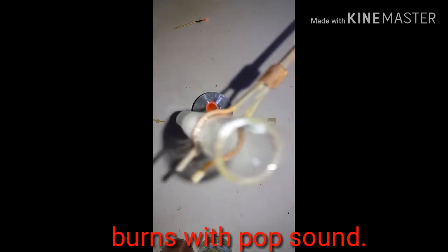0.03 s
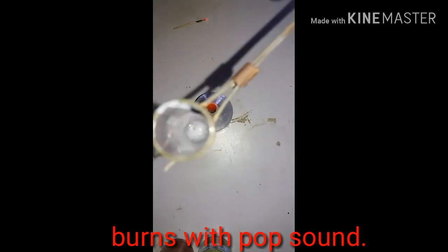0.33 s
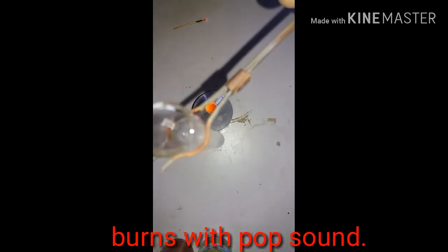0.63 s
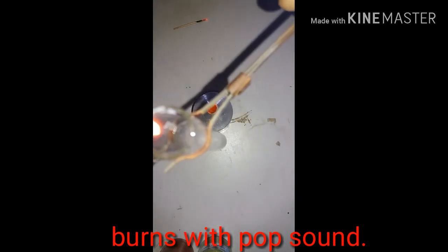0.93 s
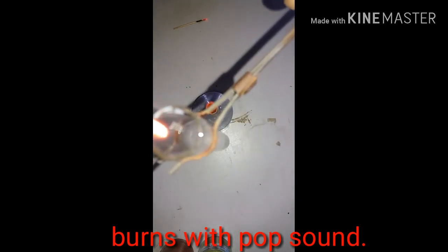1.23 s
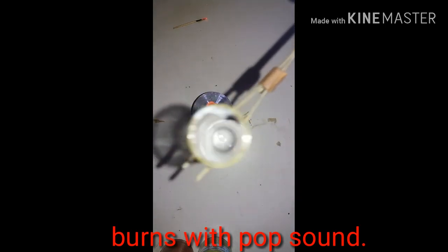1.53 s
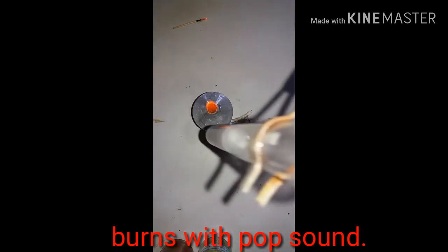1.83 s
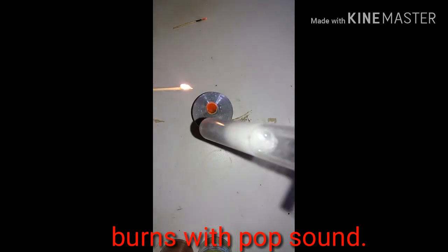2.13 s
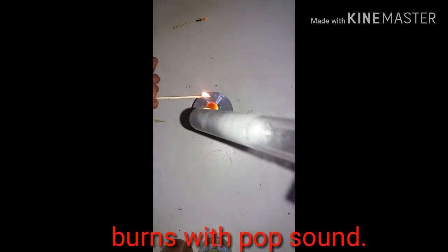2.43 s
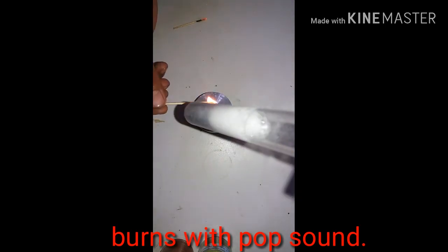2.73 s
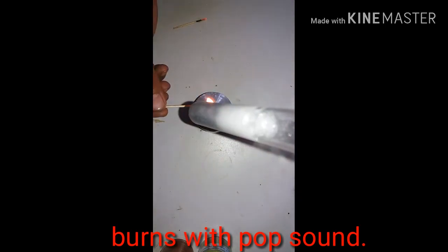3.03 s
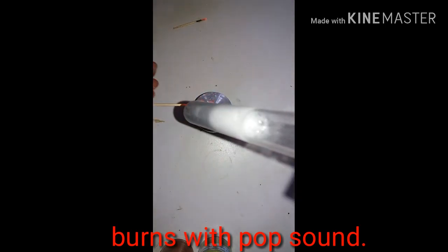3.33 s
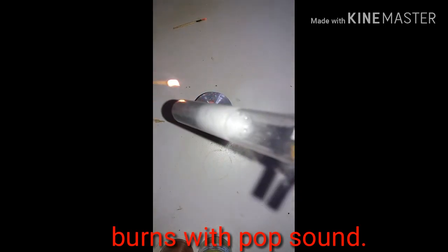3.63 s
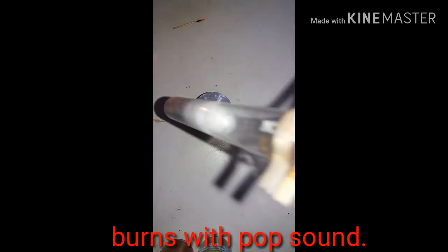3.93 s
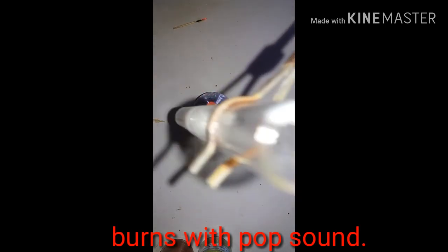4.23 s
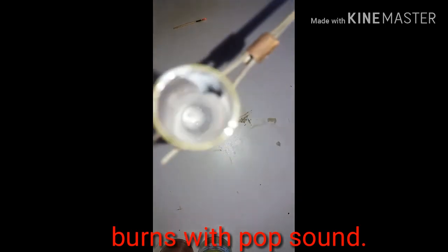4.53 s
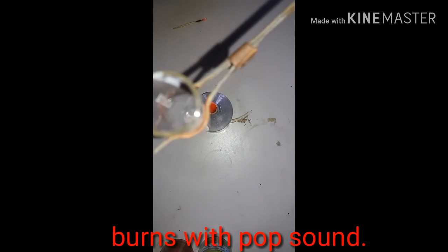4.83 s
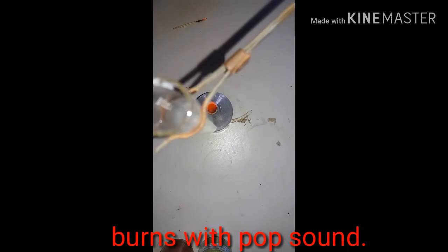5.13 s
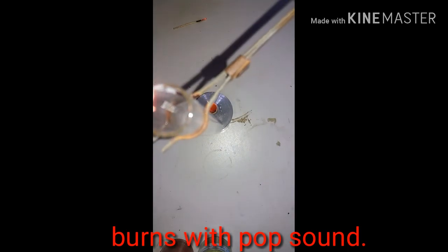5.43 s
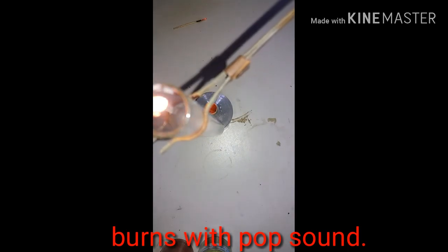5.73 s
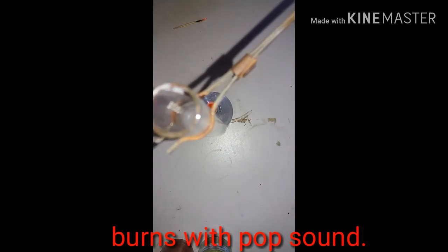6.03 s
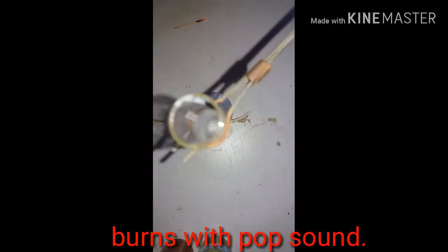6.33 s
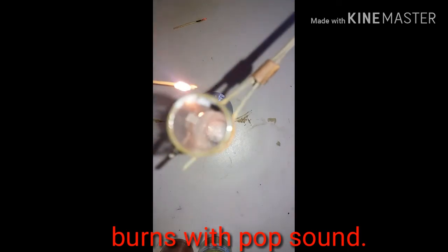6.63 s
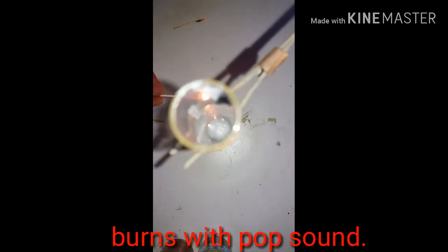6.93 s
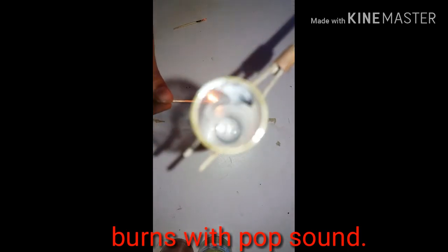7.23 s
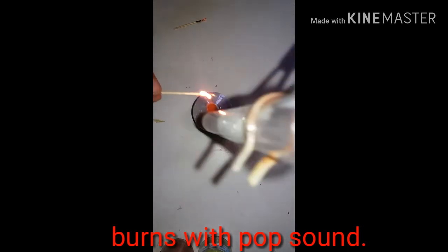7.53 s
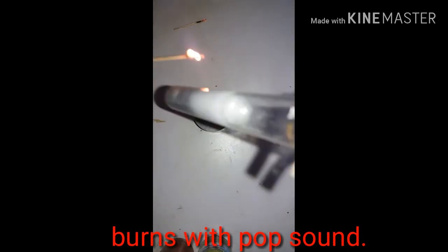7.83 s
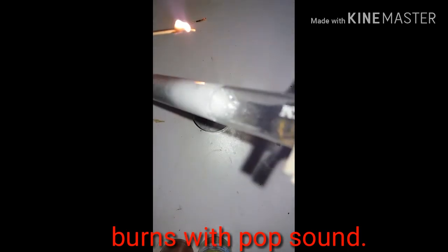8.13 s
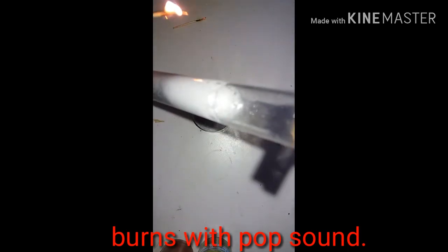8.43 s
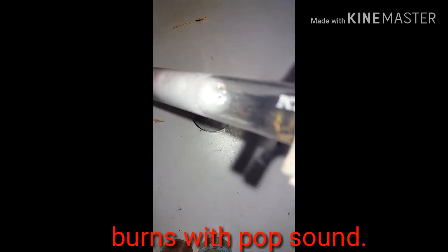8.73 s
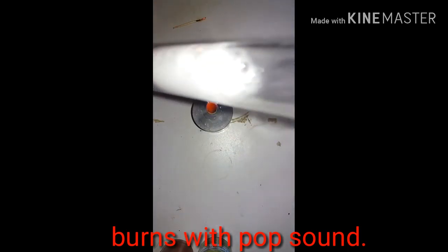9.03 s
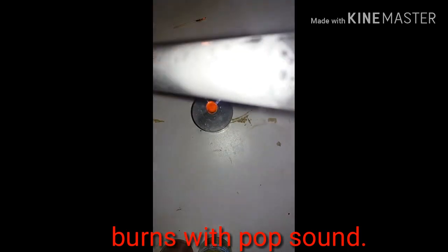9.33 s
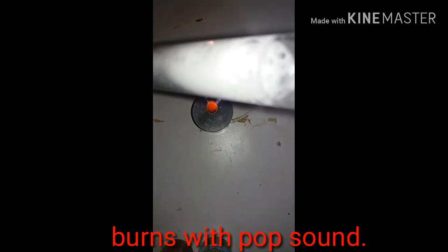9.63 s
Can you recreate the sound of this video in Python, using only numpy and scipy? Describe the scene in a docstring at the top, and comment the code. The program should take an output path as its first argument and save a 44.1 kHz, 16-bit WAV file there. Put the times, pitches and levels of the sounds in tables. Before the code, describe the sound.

A bare, echoing lab is heard through one microphone near a glass test tube, with quiet, hollow room noise and a faint high hiss throughout. At about 1.2 seconds gas ignites in the tube with a sharp pop: a low thump, a very brief whistle and a puff of flame all at once, ringing in the room for a second or so. Around 2.5 seconds a muffled vehicle passes outside, its engine droning softly. At 5.8 seconds comes a second, duller pop, about as loud, with a similar echo. More faint traffic follows around 6.5 seconds, and the background noise steps up slightly at 6.9 seconds. Another soft rumble passes near 8 seconds. From about 9 seconds the distant engine pulls again and a faint hollow tone swells. The two pops stand far above everything else.

```python
"""A bare, echoing lab, one microphone near a glass test tube; still air, faint hiss, traffic outside.
At 1.2 s hydrogen is lit at the tube's mouth: the flame runs down it, sets its air column singing for
a few milliseconds and leaves a ring in the room. A vehicle passes beyond the walls, its engine droning.
At 5.8 s comes a second, duller pop. More muffled traffic follows, the background noise steps up
slightly at 6.9 s, and a hollow tone swells near 9.3 s as the engine pulls again."""
import sys
import numpy as np
from scipy import signal
from scipy.fft import rfft, irfft, next_fast_len
from scipy.io import wavfile

SR = 44100
rng = np.random.default_rng(int(sys.argv[2]) if len(sys.argv) > 2 else 0)


def put_to_file(sound):
    """Save the sound as 16-bit audio at rate SR, in the file named by the first command-line argument."""
    columns = np.atleast_2d(sound).T  # one column per channel
    safe = np.clip(columns, -1, 1)
    whole_steps = np.round(safe * 32767)
    wavfile.write(sys.argv[1], SR, whole_steps.astype(np.int16))


N = 435266
TIME = np.arange(N) / SR

# ignitions: at_s, level_db, flame_db, brightness_db, thump_lag_s, tube_tuning_ratio, room_db
IGNITIONS = [(1.1538, 2, -26, 5, 0.00021, .995, -6.5), (5.8060, 2.5, -23.5, -6, 0.0043, 1.003, -8.5)]
# low thump of the expanding gas: untuned_pitch_hz, first_pop_db, second_pop_db, swell_s, fade_s
THUMP_MODES = [(62, -32, -51, .003, 0.0092), (109, -20, -23.5, 0.0028, 0.012),
               (188, -13, -19, 0.0013, 0.0059), (259, -40, -24, 0.0017, 0.01)]
# air column of the tube: untuned_pitch_hz, first_pop_db, second_pop_db, swell_s, fade_s
TUBE_MODES = [(368, -26, -27, 0.00074, 0.0075), (439, -41, -24.5, 0.0025, 0.0041),
              (621, -12.5, -18, 0.0018, 0.0049), (693, -24, -22, 0.0017, 0.01),
              (881.5, -24, -16, 0.0022, 0.0075), (975, -23, -26, 0.0021, 0.0064),
              (1304, -36, -33, 0.0018, 0.012), (1488, -30.5, -32, .001, 0.0053),
              (1683, -50, -25, .001, 0.0081), (1792, -30, -51, 0.0018, 0.015),
              (1910, -50.5, -34, .001, 0.0063), (2092, -26.5, -28, 0.0012, 0.011),
              (2213, -19, -36, 0.00037, 0.0065), (2349, -10.5, -8, 0.00095, 0.0035),
              (2660, -45, -38, 0.00094, 0.0046), (3390, -44, -50.5, 0.00094, .004),
              (4490, -48.5, -79, .0008, 0.003)]
# turbulent flame: frequency_hz, relative_db
FLAME_SPECTRUM = [(30, -19.5), (150, -3), (500, -7), (800, -4.5), (1150, -7.5), (1800, -4.5), (2350, 1.5),
                  (2650, -5.5), (3050, -21), (3600, -23), (4100, -31.5), (4700, -32), (6000, -41),
                  (8500, -43.5), (14000, -65)]
# time the lab's echo takes to fall 60 dB: frequency_hz, decay_s
LAB_DECAY = [(60, 0.47), (170, 2.62), (600, 1.4), (2300, 1.72), (4500, 1.7), (10000, 1.5)]
# strength of the lab's echo: frequency_hz, relative_db
LAB_ECHO_SPECTRUM = [(50, 1.5), (85, -1), (125, 4), (185, 2.5), (300, 4), (600, -3), (900, -2), (1300, 1.5),
                     (2300, -3.5), (4500, -4.5), (8000, -9)]
# vehicles passing outside: nearest_s, approach_s, retreat_s, rumble_db, tyres_db
VEHICLE_PASSES = [(2.5, 0.69, 0.98, -55.5, -54.5), (6.41, 0.42, 1.0, -54.5, -54.5),
                  (8.15, 0.16, .15, -54.5, -63), (9.55, 0.54, 0.21, -50, -51.5)]
# traffic rumble from indoors: frequency_hz, relative_db
RUMBLE_SPECTRUM = [(20, -18.5), (45, -25), (80, -5), (135, 6.5), (190, 1.5), (250, -4.5), (330, 0.5),
                   (420, -2.5), (520, -17), (900, -46)]
# tyre noise from indoors: frequency_hz, relative_db
TYRE_SPECTRUM = [(200, -15), (480, 0.5), (700, -3), (1100, -0.5), (1500, 0.5), (2000, -2.5), (2450, -6),
                 (2650, -10.5), (2950, -16.5), (3500, -20), (4000, -30), (5000, -41.5), (12000, -38.5)]
# an engine pulling harder: peak_s, build_s, ease_s, boom_db, drone_db
ENGINE_SURGES = [(2.48, .42, .55, -57, -48), (3.04, 0.24, .04, -51.5, -60), (6.65, 0.45, 0.48, -52, -50),
                 (7.83, .12, .12, -54.5, -55.5), (9.17, 0.38, .04, -51, -48),
                 (9.6, 0.33, 0.082, -51, -44.5)]
# engine speed: time_s, rotation_hz
ENGINE_ROTATION = [(0, 33), (2.4, 31), (3.8, 33.3), (4.6, 30.3), (5.8, 30), (6.8, 33.5), (7.7, 31.5),
                   (9.0, 33.4), (9.87, 32.5)]
# still room air: frequency_hz, relative_db
AIR_SPECTRUM = [(20, -28), (42, -19), (65, -7), (110, 1.5), (170, -0.5), (300, -5.5), (500, -12),
                (900, -14), (1500, -15.5), (2400, -22), (2800, -31), (3500, -31), (4300, -41),
                (9000, -46.5)]
# resonances that colour traffic and room air: centre_hz, width_hz, gain_db
HOLLOW_RESONANCES = [(301.2, 15, 6), (650, 66, 9.5), (883, 41, 7.5), (2327, 91, 6), (3500, 200, -1)]
# high hiss: frequency_hz, relative_db
HISS_SPECTRUM = [(2500, -27), (4500, -9), (6500, -6), (8500, -.5), (10500, 0), (13000, -1.5), (15500, -1.5)]


def hydrogen_pops(thump_tuning=0.99, roar_db=9.0):
    """Near the microphone: each ignition is a thump, a brief whistle of the tube and a puff of flame."""
    out = np.zeros(N)
    for pop, (at_s, level_db, flame_db, bright_db, lag_s, tuning, room_db) in enumerate(IGNITIONS):
        burning = np.abs(TIME - at_s) < .15
        t = TIME[burning] - at_s
        tones, puff = np.zeros((2, N))
        puff[burning] = from_db(flame_db) * flame(bright_db)[burning] * flare(t, 0.0026, 0.0037)
        thump = gas_modes(t - lag_s, THUMP_MODES, pop, thump_tuning)
        whistle = gas_modes(t, TUBE_MODES, pop, tuning)
        tones[burning] = thump + whistle
        # the jet of flame throws its noise out into the room, so the echo is rougher than the pop
        echo = lab_echo(tones + from_db(roar_db) * puff)
        out += from_db(level_db) * (tones + puff + from_db(room_db) * echo)
    return out


def gas_modes(t, modes, pop, tuning):
    """Modes driven by the flame; each mixture of gas and air favours different ones."""
    out = 0
    for k, (hz, *levels_db, swell_s, fade_s) in enumerate(modes):
        tone = np.cos(2 * np.pi * hz * tuning * t + np.pi * k)
        out += from_db(levels_db[pop]) * flare(t, swell_s, fade_s) * tone
    return out


def flame(bright_db, shelf_hz=3600):
    """Noise of turbulent burning, its treble raised or lowered."""
    return noise([(hz, db + bright_db / (1 + (shelf_hz / hz) ** 4)) for hz, db in FLAME_SPECTRUM])


def flare(t, swell_s, fade_s):
    """Grows exponentially while the flame feeds it, dies away once the gas is spent."""
    return np.exp(-np.logaddexp(-t / swell_s, t / fade_s))


def lab_echo(source, delay_s=0.0049, early_db=7.0, early_s=0.024):
    """Diffuse echoes die band by band; the nearest walls give a stronger start."""
    t = TIME[:2 * SR]
    hz = np.fft.rfftfreq(len(t), 1 / SR)
    white = rfft(rng.standard_normal(len(t)))
    centres_hz = 50 * 2 ** (np.arange(18) / 2)  # half-octave bands
    echo = 0
    for centre, only_this_band in zip(centres_hz, np.eye(len(centres_hz))):
        passband = at_hz(np.c_[centres_hz, only_this_band], hz)
        tail = irfft(white * passband) * np.exp(-np.log(1000) * t / at_hz(LAB_DECAY, centre))
        strength = from_db(at_hz(LAB_ECHO_SPECTRUM, centre)) * np.sqrt(np.mean(passband ** 2))
        echo += strength * tail / np.linalg.norm(tail)
    onset = np.clip(t / delay_s - 1, 0, 1)
    near_walls = from_db(early_db * np.exp(-t / early_s))
    return signal.fftconvolve(source, echo * onset * near_walls)[:N]


def traffic(rumble_gain, tyre_gain):
    """Vehicles outside: rumble and tyre noise that come through the walls."""
    rumble = rumble_gain * noise(RUMBLE_SPECTRUM, HOLLOW_RESONANCES)
    tyres = tyre_gain * noise(TYRE_SPECTRUM, HOLLOW_RESONANCES)
    return rumble + tyres


def engine(distant_db=-76):
    """An engine's second and third orders come through the walls and swell when it pulls."""
    rotation_hz = np.interp(TIME, *np.transpose(ENGINE_ROTATION))
    boom_gain, drone_gain = np.hypot(swells(ENGINE_SURGES), from_db(distant_db))
    exhaust_boom = boom_gain * engine_order(2 * rotation_hz, wander_hz=1.77, flutter_db=2.0)
    drone = drone_gain * engine_order(3 * rotation_hz, wander_hz=1.8, flutter_db=2.5)
    return exhaust_boom + drone


def engine_order(hz, wander_hz, flutter_db):
    """One harmonic of the engine's rotation, unsteady in pitch and strength."""
    phase = 2 * np.pi * np.cumsum(hz + wander_hz * drift(rate_hz=4.6)) / SR
    return unit_rms(np.sin(phase) * from_db(flutter_db * drift(rate_hz=5.3)))


def passing(at_s, approach_s, retreat_s):
    """Comes up in a bell curve, then falls off as one over the distance."""
    t = TIME - at_s
    return np.where(t < 0, np.exp(-.5 * (t / approach_s) ** 2), 1 / np.hypot(1, t / retreat_s))


def swells(events):
    """One gain curve for each level column; events that overlap add in power."""
    return np.sqrt(sum(np.outer(from_db(levels_db), passing(at_s, approach_s, retreat_s)) ** 2
                       for at_s, approach_s, retreat_s, *levels_db in events))


def hollow_tone(hz=1342, width_hz=60):
    """Background noise caught in one narrow resonance; it swells once."""
    band = signal.butter(2, [hz - width_hz / 2, hz + width_hz / 2], "band", fs=SR, output="sos")
    swell = from_db(-58.5) * passing(at_s=9.28, approach_s=.27, retreat_s=0.25)
    return swell * unit_rms(signal.sosfilt(band, rng.standard_normal(N)))


def room_air():
    """Room tone: the low, hollow noise of still air around the microphone."""
    return from_db(-58) * noise(AIR_SPECTRUM, HOLLOW_RESONANCES)


def hiss(tyre_gain, knee_db=-66.5, share=0.27):
    """A faint high hiss that follows a share of the tyre noise's rise above the knee."""
    rise = np.hypot(1, tyre_gain / from_db(knee_db)) ** share
    return from_db(-76) * rise * noise(HISS_SPECTRUM)


def noise(spectrum, resonances=()):
    """Unit-power noise with a smooth spectrum and resonant bumps."""
    size = next_fast_len(N)
    hz = np.fft.rfftfreq(size, 1 / SR)
    bumps_db = sum(db / (1 + (2 * (hz - centre) / width) ** 2) for centre, width, db in resonances)
    colour = from_db(at_hz(spectrum, hz) + bumps_db)
    return unit_rms(irfft(rfft(rng.standard_normal(size)) * colour, size)[:N])


def drift(rate_hz, hop=40):
    """Slow random wander with a spread of 1."""
    pole = np.exp(-2 * np.pi * rate_hz * hop / SR)
    white = rng.standard_normal(N // hop + 2002)
    slow = signal.lfilter([1], [1, -2 * pole, pole * pole], white)[2000:]  # once the filter has settled
    return np.interp(np.arange(N) / hop, np.arange(len(slow)), unit_rms(slow))


def at_hz(points, hz):
    """Read a curve on a log-frequency axis."""
    points_hz, values = np.transpose(points)
    return np.interp(np.log(np.maximum(hz, 1)), np.log(points_hz), values)


def from_db(db):
    """Decibels to gain."""
    return 10 ** (np.asarray(db) / 20)


def unit_rms(x):
    """Scale to unit power."""
    return x / np.sqrt(np.mean(x ** 2) + 1e-20)


def scene(step_s=6.88, step_db=2, rise_s=0.027):
    """Close pops over a distant engine and background noise that steps up once and stays there."""
    rumble_gain, tyre_gain = swells(VEHICLE_PASSES)
    step = from_db(step_db * np.clip((TIME - step_s) / rise_s, 0, 1))
    background = traffic(rumble_gain, tyre_gain) + hollow_tone() + room_air() + hiss(tyre_gain)
    return (hydrogen_pops() + engine() + step * background)[None]


def record(dry, cutoff_hz=15550):
    """One microphone channel, the top cut steeply."""
    return signal.sosfilt(signal.ellip(12, .1, 70, cutoff_hz, fs=SR, output="sos"), dry)


dry = scene()
out = record(dry)
put_to_file(out)
```